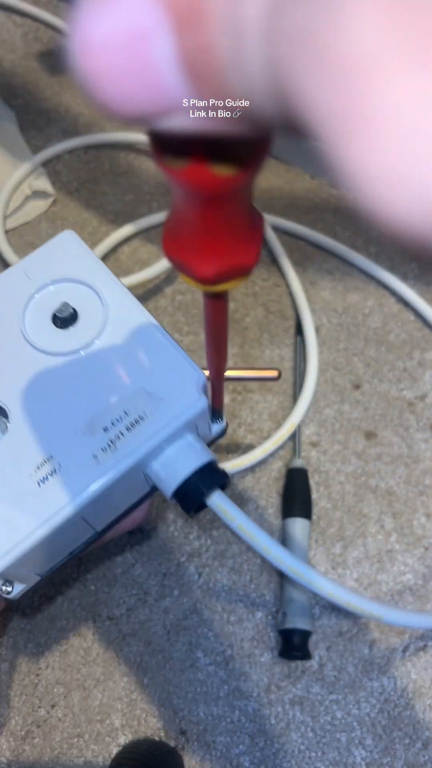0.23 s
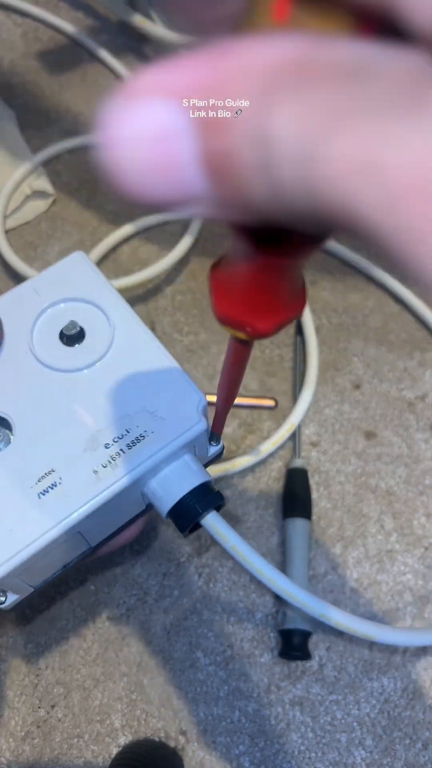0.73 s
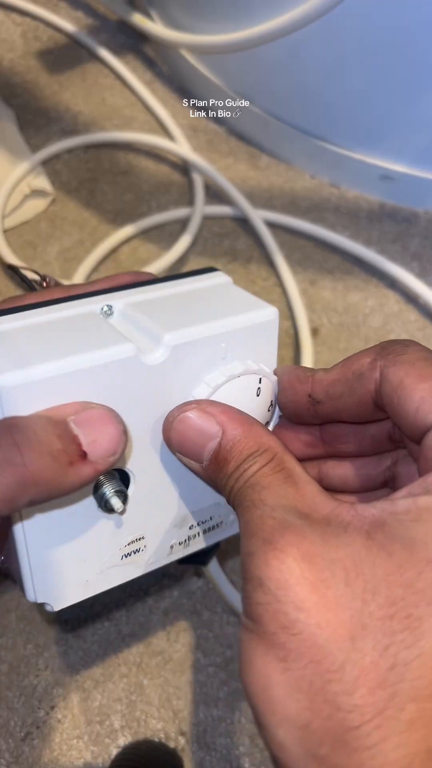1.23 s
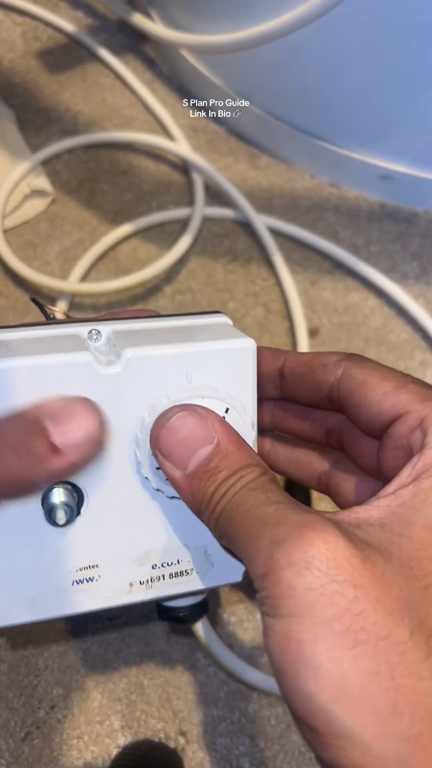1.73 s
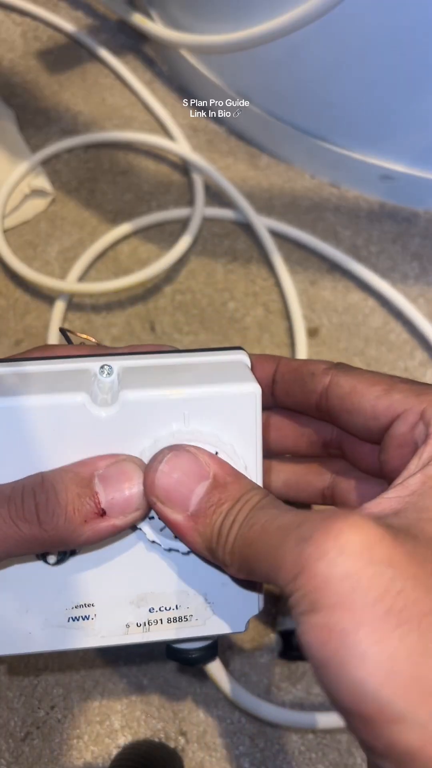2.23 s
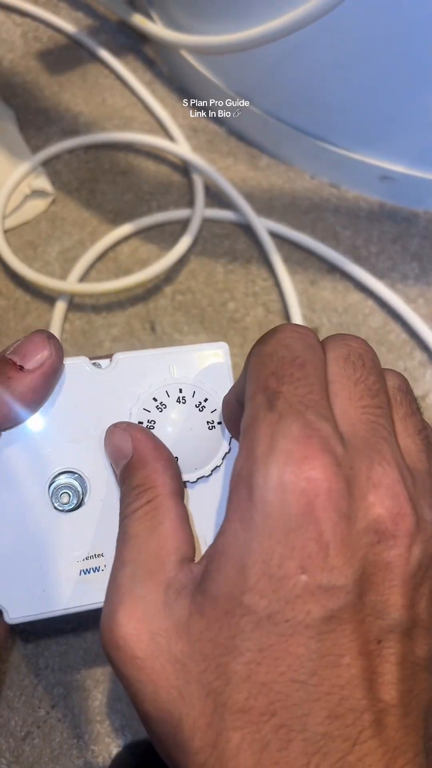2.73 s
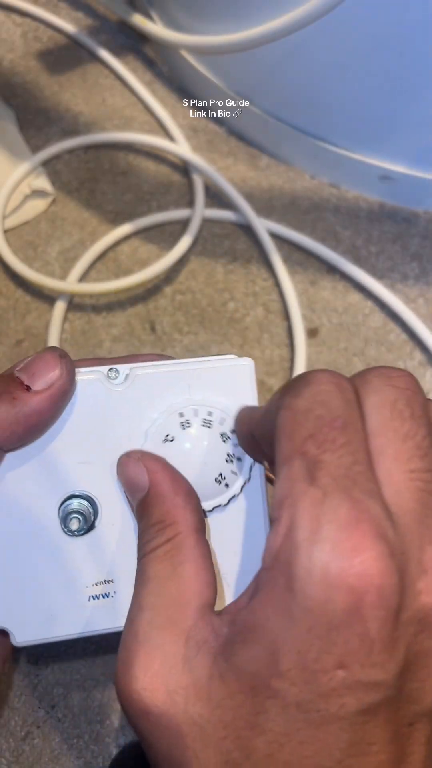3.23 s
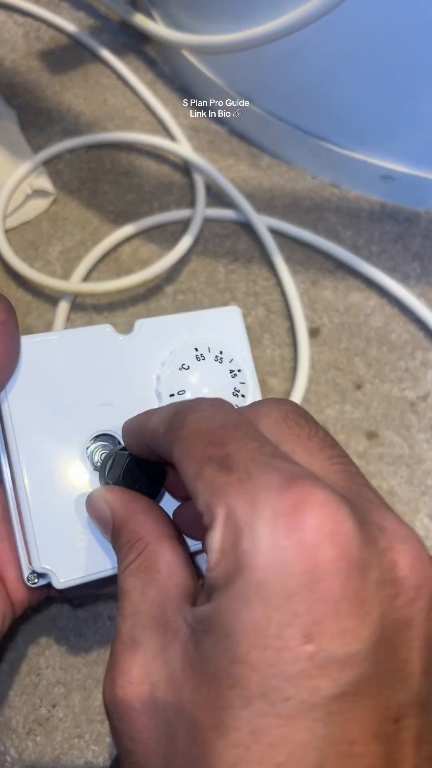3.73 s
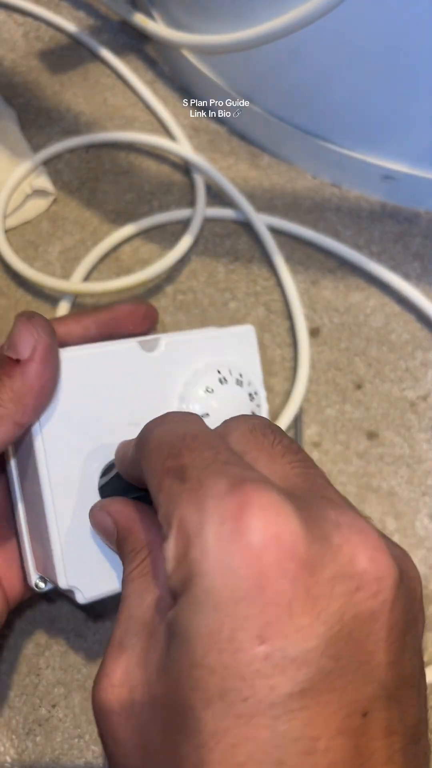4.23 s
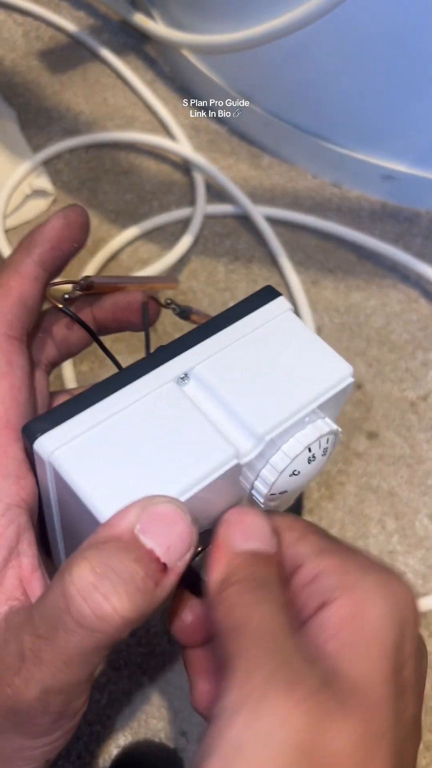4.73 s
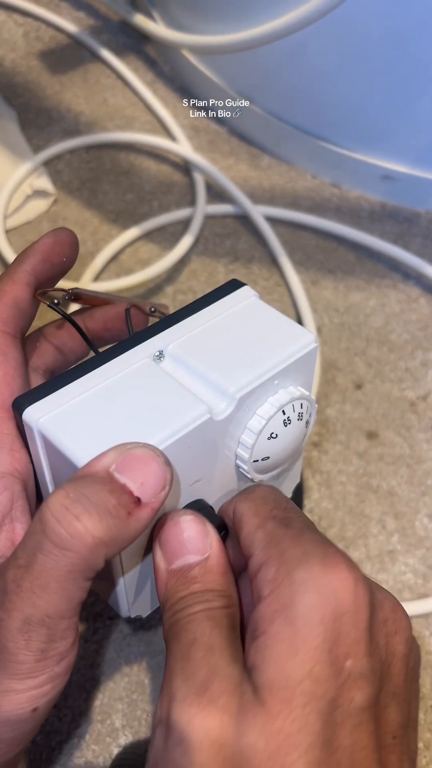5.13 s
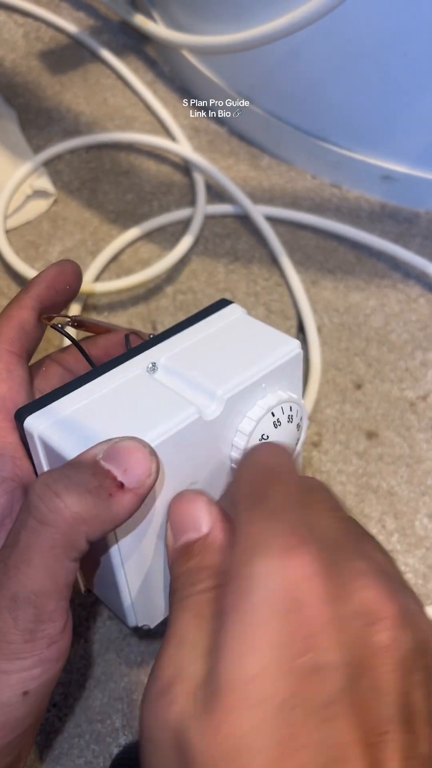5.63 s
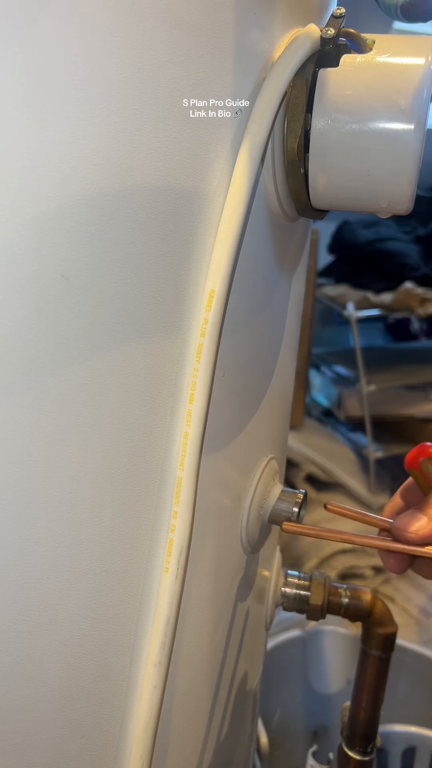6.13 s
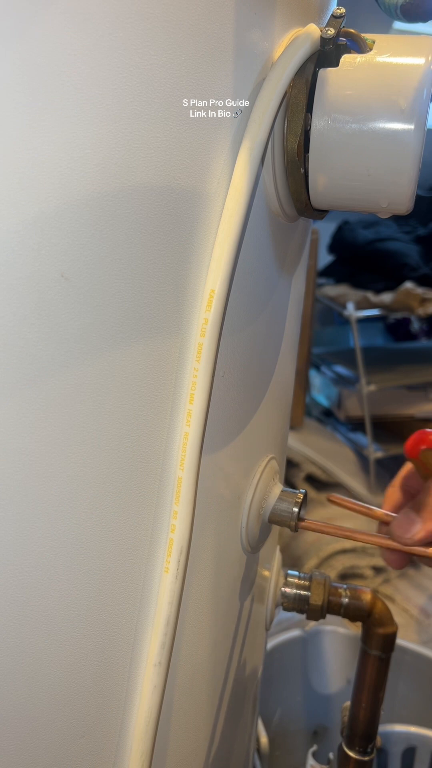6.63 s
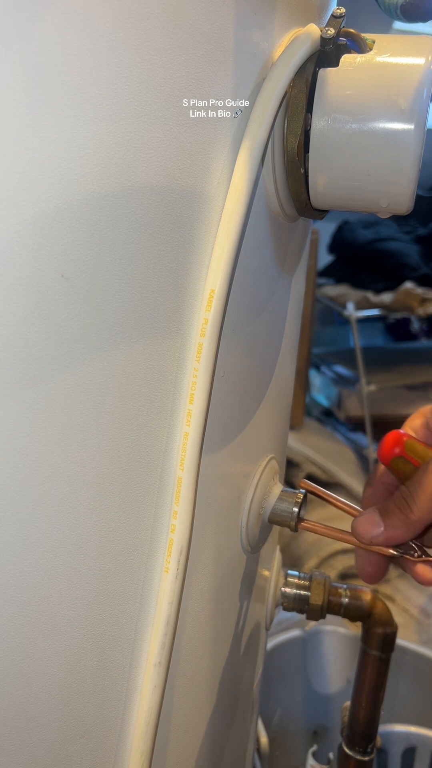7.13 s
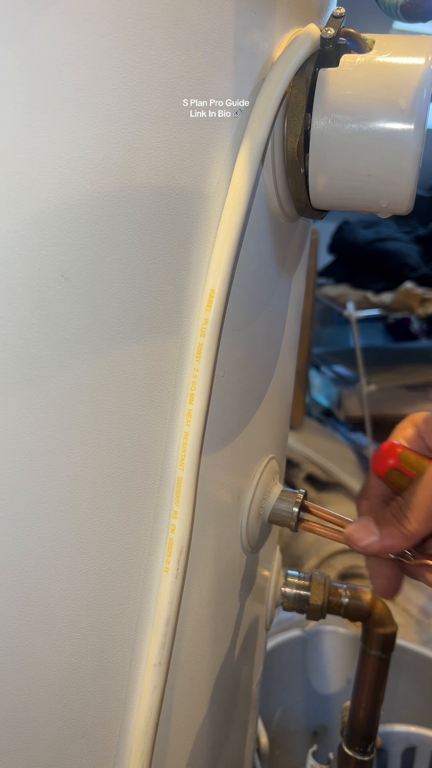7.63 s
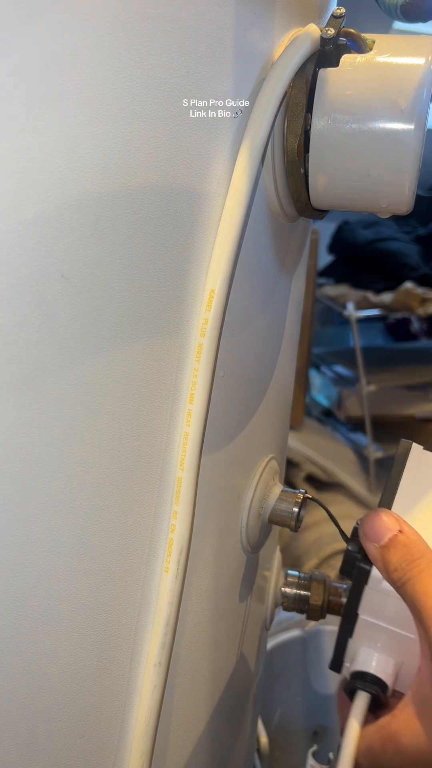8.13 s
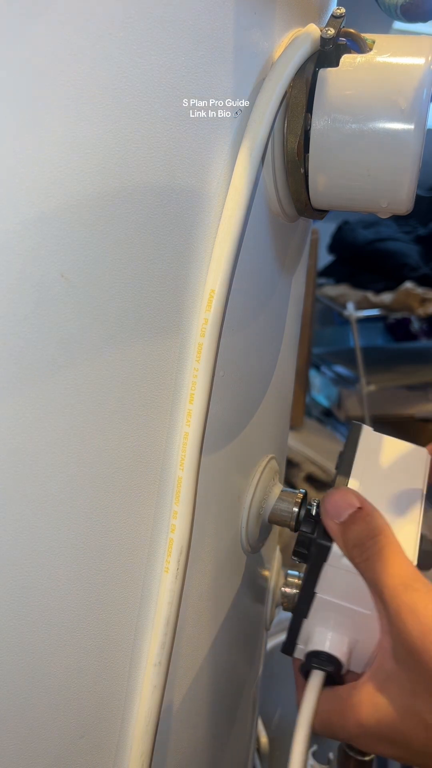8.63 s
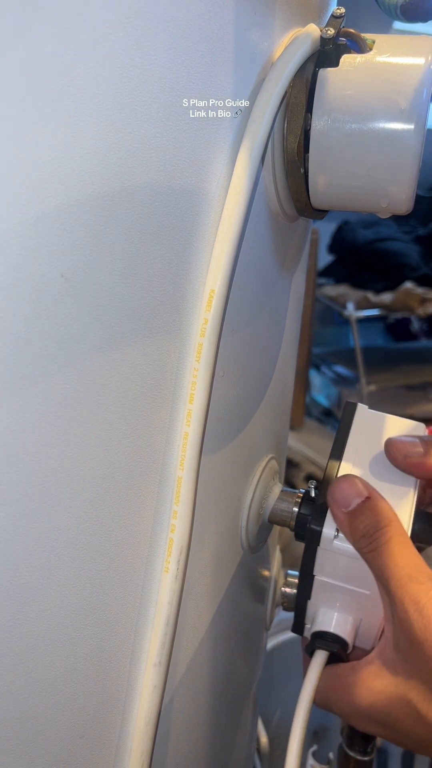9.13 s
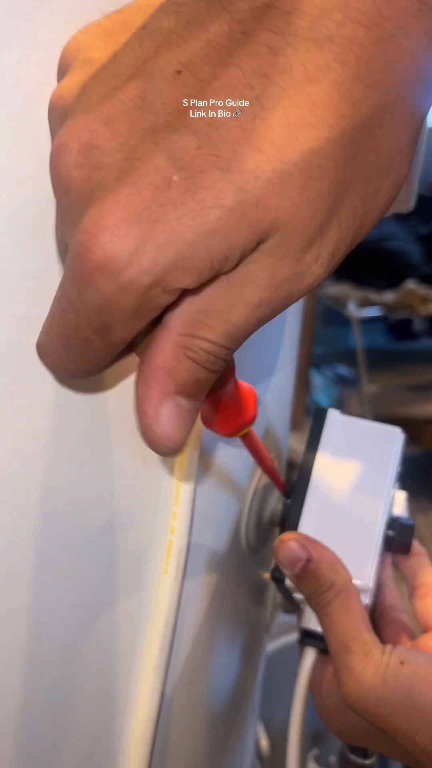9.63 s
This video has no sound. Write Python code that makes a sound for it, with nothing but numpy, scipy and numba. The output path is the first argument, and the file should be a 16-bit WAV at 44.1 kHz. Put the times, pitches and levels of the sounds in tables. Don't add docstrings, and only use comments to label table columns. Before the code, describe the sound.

A phone held near the hands picks up dry plastic taps, soft skin rubbing and low house hum. Two crisp knob snaps come early, later a lighter cap snap and a dull hand thump. After a short gap, copper rods touch a hollow steel pocket, scrape and squeak, then are pushed in with dense metallic clatter. A hard knock makes the tank resonate roughly; creaks and a final snap with light taps close it.

```python
import sys
import numpy as np
from scipy import signal
from scipy.fft import rfft, irfft
from scipy.io import wavfile
from scipy.ndimage import uniform_filter1d
from numba import njit

SR = 44100
rng = np.random.default_rng(int(sys.argv[2]) if len(sys.argv) > 2 else 0)


def boost(x):
    u = np.asarray(x, float) / 20
    return 10 ** u


def waveform_to_disk(signal):
    frames = np.transpose(np.atleast_2d(signal))
    scaled = np.clip(frames, -1, 1) * 32767
    samples = np.round(scaled).astype(np.int16)
    wavfile.write(sys.argv[1], SR, samples)


N = 435257
TIME, FREQ = np.arange(N) / SR, np.fft.rfftfreq(N, 1 / SR)
LEFT_RIGHT = np.array([[1], [-1]])


def unit(x):
    return x / np.sqrt(np.mean(x ** 2))


def on_hz(table):
    hz, value = np.transpose(table)
    return np.interp(np.log(FREQ + 1), np.log(hz), value)


def colour(x, gain):
    return unit(irfft(rfft(x) * gain, N))


def band(lo_hz, hi_hz):
    return 1 / np.sqrt((1 + (lo_hz / (FREQ + 1)) ** 8) * (1 + (FREQ / hi_hz) ** 8))


def curves(tables):
    rows = np.array([row for table in tables for row in table])
    inside = sum((TIME >= table[0][0]) & (TIME <= table[-1][0]) for table in tables) > 0
    return inside, [np.interp(TIME, rows[:, 0], column) for column in rows[:, 1:].T]


def walk(rate):
    k = int(SR / rate)
    held = np.repeat(rng.standard_normal(N // k + 1), k)
    return 0.91 * uniform_filter1d(held, k)[:N]


def grit(rate, spread_db, smooth):
    size = boost(spread_db * rng.exponential(size=N).clip(0, 3.5))
    slips = (rng.random(N) < rate / SR) * rng.standard_normal(N) * size
    return unit(slips) + smooth * rng.standard_normal(N)


def add(out, s, sound):
    i = int(s * SR)
    out[i:i + len(sound)] += sound[:N - i]


@njit
def svf(x, hz, width):
    y, b, l = np.empty(len(x)), 0., 0.
    for i in range(len(x)):
        g, k = np.tan(np.pi * hz[i] / SR), width / hz[i]
        v = (b + g * (x[i] - l)) / (1 + g * (g + k))
        b, l, y[i] = 2 * v - b, l + 2 * g * v, k * v
    return y


def blows(events, body, octaves, skirt_db, detune, crack_hz, knock_hz, knock_s):
    out, t = np.zeros(N), TIME[:2048]
    small = signal.butter(2, 420, "high", fs=SR, output="sos")
    crack_band = signal.butter(2, crack_hz, "band", fs=SR, output="sos")
    hz, t60 = np.repeat(np.transpose(body), 3, axis=1)[:, :, None]
    for s, db, main_hz, crack_db, knock_db, chatter_ms in events:
        chance, noise = rng.standard_normal((len(hz), 3)), rng.standard_normal((2, len(t)))

        skirt = boost(skirt_db) * np.minimum((main_hz / hz) ** 2.6, (hz / main_hz) ** 3) ** .5
        near_main = np.exp(-(np.log2(hz / main_hz) / octaves) ** 2)
        weight = (near_main + skirt) * boost(1.5 * chance[:, :1])
        tone = np.sin(2 * np.pi * hz * (1 + detune * chance[:, 1:2]) * t)
        ring = weight * tone * np.sign(chance[:, 2:]) * 1000. ** (-t / t60)

        contact = t * np.exp(-t * 1000 / np.clip(.5 * chatter_ms, .2, 4))
        chatter = rfft(contact * noise[0] * np.abs(noise[0]))
        chatter = irfft(chatter / np.abs(chatter) ** .8)
        chatter *= np.exp(-t * 1000 / (2 * chatter_ms))
        ring = signal.sosfilt(small, signal.fftconvolve(ring.sum(axis=0), chatter)[:len(t)])

        crack = signal.sosfilt(crack_band, contact * noise[1])
        knock = np.sin(2 * np.pi * knock_hz * (1 + 0.12 * chance[0, 1]) * t) * t * np.exp(-t / knock_s)
        for part, part_db in ((ring, 0), (crack, crack_db), (knock, knock_db)):
            add(out, s, boost(db + part_db) * part / np.abs(part).max())
    return out


def strokes(table, edge_ms, fade_db, glide_ms):
    s, length_ms, *columns = np.transpose(table)
    last = np.maximum(np.searchsorted(s, TIME) - 1, 0)
    along = (TIME - s[last]) * 1000 / length_ms[last]
    shape = ((along > 0) & (along < 1)) * boost(fade_db * along.clip(0, 1))
    edge, glide = int(edge_ms * SR / 1000), int(glide_ms * SR / 1000)
    out = []
    for column in columns:
        if column[0] > 0:
            out.append(uniform_filter1d(column[last], glide))
        else:
            out.append(uniform_filter1d(shape * boost(column[last]), edge))
    return out


def shifting(x, peaks, between_db, edges_hz, swing_db):
    rings = 0
    for hz, width, db in peaks:
        rings = rings + boost(db + swing_db * walk(16)) * svf(x, hz * (1 + 0.028 * walk(14)), 1. * width)
    return colour(rings + boost(between_db) * x, band(*edges_hz))


# start_s, level_db
HUM_LEVEL = [(0, -58), (1.9, -59.5), (2.2, -60), (2.7, -76), (3.3, -69.5), (4.0, -66), (4.7, -58.5),
             (5.15, -65), (5.3, -77), (6.0, -66.5), (8.5, -64.5), (9.87, -65)]
# pitch_hz, level_db (per Hz)
HUM_TONE = [(12, -58), (20, -35.5), (51, -4), (102, 0.5), (157, -18), (260, -30.5), (340, -60.5),
            (570, -120)]
# pitch_hz, level_db (per Hz)
AIR_TONE = [(100, -36), (170, -7.5), (475, 0.5), (708, -6.5), (2130, -4.5), (2950, -15), (7770, -25),
            (16000, -40)]
# pitch_hz, correlation (0 to 1)
AIR_LIKENESS = [(100, 0.72), (400, 0.21), (1500, 0.75), (4000, 0.24), (12000, 0.24)]


def background():
    _, (hum_db,) = curves([HUM_LEVEL])
    hum = boost(hum_db - 0.47 + 2.0 * walk(11)) * colour(rng.standard_normal(N), boost(on_hz(HUM_TONE)))
    like = np.clip(on_hz(AIR_LIKENESS), 0, 1)
    noise = rfft(rng.standard_normal((2, N))) * boost(on_hz(AIR_TONE))
    mid, side = noise[0] * np.sqrt(1 + like), noise[1] * np.sqrt(1 - like)
    air = boost(-74.5) * unit(irfft(np.array([mid + side, mid - side]), N))
    return hum + .07 * np.roll(hum, SR) * LEFT_RIGHT + air


# start_s, peak level_db, start pitch_hz, end pitch_hz, rise_ms
BUMPS = [
    (2.019, -45, 414, 75, 12.7),
    (2.509, -41, 294, 62, 11.6),
    (4.554, -39, 130, 81, 14.6),
    (4.594, -25.5, 680, 141, 11.4),
    (4.624, -37.5, 133, 94, 15.6),
    (4.678, -51.5, 397, 300, 9),
]


def bumps():
    out, t = np.zeros(N), TIME[:6000]
    for s, db, start_hz, end_hz, rise_ms in BUMPS:
        late = t * 1000 / rise_ms
        hz = end_hz + (start_hz - end_hz) * np.exp(-late / 0.38)
        swell = (late * np.exp(1 - late)) ** 2
        add(out, s, boost(db) * swell * np.sin(2 * np.pi * np.cumsum(hz) / SR))
    return out


# pitch_hz, level_db, decay_s (to -60 dB)
TANK_MODES = [(88.9, 0, .2), (160, -4, 0.67), (235, 2, 0.22), (290, -8, 0.78), (404.6, -8, 0.22),
              (558, -11, 0.44), (702.4, -2, 0.22)]
TANK_BLOWS_S = [8.06, 8.668, 9.12]
TANK_BLOWS_DB = [-55, -38, -55]
# start_s, peak_s, end_s,
# pitch_hz, level_db
LONG_HUMS = [(8.04, 8.12, 8.32, 283.5, -53.5), (6.86, 6.93, 7.01, 570, -63),
             (9.618, 9.635, 9.675, 690, -61), (7.72, 7.8, 7.87, 560, -55), (6.75, 6.78, 6.95, 4870, -62),
             (6.765, 6.8, 6.85, 5120, -52), (7.015, 7.03, 7.16, 4950, -72),
             (8.03, 8.095, 8.17, 3705, -48.5), (6.13, 6.14, 6.195, 2360, -52),
             (6.185, 6.205, 6.225, 2150, -57.5), (6.14, 6.178, 6.2, 1700, -56.5),
             (6.13, 6.135, 6.24, 6800, -60), (0.968, 0.985, 1.03, 400, -58), (1.48, 1.5, 1.565, 1090, -63),
             (4.172, 4.187, 4.225, 1120, -55)]


def tank():
    out, t = np.zeros(N), TIME[:SR // 2]
    for s, blow_db in zip(TANK_BLOWS_S, TANK_BLOWS_DB):
        for hz, db, t60 in TANK_MODES:
            waver = unit(uniform_filter1d(rng.standard_normal(len(t)), int(t60 * SR * 0.025)))
            fade = 1000. ** (-t / t60) * np.minimum(t * hz, 1)
            add(out, s, boost(blow_db + db) * (0.1 + waver) * np.sin(2 * np.pi * hz * t) * fade)
    for start, peak, end, hz, db in LONG_HUMS:
        turn = 2 * np.pi * np.cumsum(hz * (1 + .02 * walk(350))) / SR
        swell = np.interp(TIME, [start, peak, end], [0, 1, 0])
        out += boost(db + 3 + 4 * walk(90)) * swell * np.sin(turn)
    return out


# start_s, length_ms, hiss level_db, creak level_db, creak pitch_hz
RUB_KNOB = [(0.03, 76, -63.5, -84, 1820), (0.145, 24, -70, -58.5, 1050), (0.19, 63, -63, -74, 3900),
            (0.335, 77, -64.5, -80, 3270), (0.46, 104, -71, -74, 850), (0.65, 84, -63, -84, 860),
            (0.77, 45, -85, -68, 860), (0.96, 48, -102, -72, 910), (1.24, 104, -82.5, -72.5, 785),
            (1.475, 26.7, -59, -53.5, 1100), (1.6, 36, -70, -61, 1100), (1.65, 91, -75, -70, 3860),
            (1.75, 42.6, -52.5, -57, 1175), (2.24, 44, -99, -68.5, 2930), (2.73, 94, -92, -81, 3230),
            (2.85, 91, -85.5, -77, 3150), (3.04, 110, -88, -76, 2800), (3.13, 110, -86, -78, 3200)]
RUB_CAP = [(3.87, 77, -82, -66, 4170), (4.159, 65.8, -87, -64, 1135), (4.47, 36, -94, -64, 2560),
           (4.643, 84.5, -72, -64.5, 1990), (4.859, 96, -73, -72, 2000), (5.3, 113, -80.5, -100, 2130),
           (5.512, 77, -66, -72, 2410), (5.702, 59.6, -65.5, -60.5, 2010), (5.788, 34.2, -62, -68, 2120),
           (5.91, 33, -95, -65, 4370), (8.698, 29.2, -85.5, -57.5, 795), (8.879, 54.3, -60.5, -52, 2170),
           (9.063, 92, -80.5, -65, 2200), (9.38, 94.4, -79, -65.5, 2300), (9.596, 85, -71.5, -65, 830)]


def fingers():
    hiss_gain, creak_gain, creak_hz = strokes(list(RUB_KNOB) + list(RUB_CAP), 22, -0.55, 11.0)
    on_cap = (TIME > 3.6) & (TIME < 9.0)
    hiss_hz = np.where(on_cap, 8970., 7200.)
    skin, catch = grit(3300, 11.0, 1.6), grit(820, 4.2, 1.0)
    hiss = boost(-10.5) * unit(svf(skin, np.clip(hiss_hz, 3000, 14000), 1100.0))
    hiss += boost(-6.0) * colour(skin, band(3000, 12000) / FREQ.clip(4000) ** 0.24)
    creak = boost(-6.5) * unit(svf(catch, np.clip(creak_hz, 300, 6000), 135.0))
    creak += boost(-3.0) * colour(catch, band(500, 3160))
    return hiss_gain * boost(2.9 * walk(40)) * hiss + creak_gain * boost(4 * walk(60)) * creak


# start_s, peak level_db, main ring pitch_hz, crack level_db (from peak)
KNOCKS = [(6.13, -34.5, 2300, -19), (6.465, -51.5, 1060, -13), (6.729, -36.5, 2295, -40),
          (6.754, -28.5, 2300, -34), (7.423, -51.5, 2290, -26), (7.67, -52.5, 930, 13),
          (7.719, -39.5, 2360, 4.5), (7.852, -36.5, 983, -12), (8.038, -21.5, 6300, -7),
          (8.079, -35.5, 1060, -28.5), (8.095, -18, 5840, -16), (8.197, -45, 3860, -24.5),
          (8.234, -36, 3530, -26), (8.235, -39, 1610, -30), (8.284, -45.5, 1610, -50),
          (8.404, -21, 6000, -6), (8.414, -14, 5940, -33.5), (8.466, -29.5, 10000, -3),
          (8.474, -25.5, 5450, -3.5), (8.521, -32.5, 8700, -1), (8.543, -22, 9400, -17),
          (8.604, -34, 4870, -1), (8.648, -39, 1760, -40), (6.048, -56.5, 2350, -30),
          (6.275, -58.5, 1060, -39.5), (6.655, -45.5, 2310, -35), (7.023, -53, 5110, -24),
          (7.692, -43, 2350, -27), (7.731, -39.5, 2350, -20), (7.93, -35.5, 1580, -25),
          (7.978, -38, 6140, -14), (8.054, -30, 5700, -15), (8.07, -32, 5700, -8), (8.14, -25, 6830, -22),
          (8.562, -43, 8900, -12), (8.582, -34, 8850, -20)]
# pitch_hz, width_hz, level_db
POCKET = [(292, 27, -6), (555.2, 8.9, 2.5), (700, 24, -1), (1060, 43, -2), (1610, 84, -6), (2350, 76, -0.5),
          (3080, 58, -17)]
PROBES = [(3760, 110, -1), (4870, 280, -5), (5290, 180, -8), (5840, 160, -7), (6100, 103, 3.5),
          (6830, 200, 0.5), (8170, 140, -1), (8840, 94, -17), (10970, 230, -11), (14400, 2900, -19)]
# start_s, length_ms, pocket level_db, probe level_db
SCRAPE = [(5.99, 45, -67, -87.5), (6.045, 28, -64, -95), (6.13, 61, -54, -55.5), (6.185, 28, -58.5, -66),
          (6.33, 72, -77, -79), (6.42, 80, -70, -74), (6.465, 33, -64, -77), (6.654, 180, -54, -74),
          (6.745, 85, -49, -47), (6.805, 50, -52, -51), (6.86, 35, -57, -69), (6.9, 22.7, -63, -85),
          (7.0, 34, -64, -78), (7.022, 113, -61, -74.5), (7.14, 120, -70.5, -85), (7.23, 79, -65.5, -83.5),
          (7.32, 71, -64.5, -82), (7.42, 52, -59.5, -79.5), (7.64, 38, -65.5, -75), (7.67, 47, -58, -56.5),
          (7.718, 79, -53, -53), (7.803, 36.5, -54, -59), (7.846, 30, -57, -52), (7.883, 63, -50, -50),
          (7.933, 36, -52, -44.5), (7.973, 32, -46, -40), (8.003, 36, -48, -43.5), (8.036, 16, -43, -35),
          (8.062, 53, -59, -41.5), (8.093, 57, -52, -37), (8.133, 32.4, -48.5, -41.5),
          (8.168, 18, -68, -66), (8.195, 21.6, -65, -47), (8.228, 40, -51, -49.5), (8.283, 16, -56.5, -72),
          (8.35, 130, -59, -69), (8.4, 31, -39.5, -34), (8.433, 24, -47.5, -48), (8.462, 27.6, -47, -34),
          (8.492, 30, -53.5, -54), (8.52, 18.7, -56, -45), (8.544, 27.4, -49.5, -35),
          (8.578, 18.6, -51.5, -42.5), (8.6, 21, -54, -43), (8.626, 58, -59.5, -62.5)]
# start_s, pitch_hz, level_db
COLUMN = [
    [(6.13, 868, -75), (6.154, 810, -64), (6.21, 1030, -60), (6.266, 1010, -74), (6.278, 960, -67),
     (6.29, 980, -86)],
    [(6.75, 1153, -54), (6.76, 1170, -48), (6.82, 900, -57), (6.96, 570, -63), (7.008, 570, -74),
     (7.03, 540, -57), (7.12, 658, -77)],
    [(7.63, 941, -74), (7.696, 934, -54), (7.71, 890, -59), (7.73, 780, -54), (7.752, 700, -51),
     (7.762, 760, -45.5), (7.84, 600, -59)],
    [(7.845, 951, -47.5), (7.857, 962, -41), (7.877, 906, -49), (7.909, 750, -42.5), (7.977, 940, -39),
     (8.009, 886, -53), (8.02, 933, -49)],
    [(8.025, 660, -42), (8.063, 640, -40.5), (8.153, 780, -48.5), (8.203, 640, -53), (8.245, 784, -51),
     (8.263, 742, -73.5), (8.3, 1150, -57)],
    [(8.36, 628, -62), (8.386, 605, -60), (8.398, 590, -41.5), (8.414, 527, -41.5), (8.45, 523, -57),
     (8.484, 631, -56.5), (8.5, 623, -68.5)],
]
COLUMN_LIGHT = [
    [(6.465, 806, -61), (6.507, 653, -57), (6.511, 674, -61.5), (6.619, 555, -86), (6.63, 565, -96)],
    [(7.13, 600, -69), (7.248, 720, -70.5), (7.384, 566, -71.5), (7.43, 1060, -65), (7.5, 640, -66)],
]
# start_s, slip rate pitch_hz, level_db
SQUEAK_LOW = [(6.668, 1180, -56), (6.684, 1181, -45), (6.716, 1180, -59), (6.73, 1220, -45.5),
              (6.754, 1210, -57), (6.77, 1294, -51), (6.785, 1090, -57)]
SQUEAK_HIGH = [(6.772, 1760, -60), (6.79, 1676, -42), (6.808, 1703, -47), (6.816, 1800, -45.5),
               (6.846, 1787, -48), (6.862, 1802, -62)]
OVERTONES_DB = [0, 1.5, -30, -24, -32], [0, -9, -12, -10, -20]
# pitch_hz, level_db, decay_s (to -60 dB)
PING = [(4860, -60, .11), (4300, -54, .17), (2950, -64, .09)]
PING_S = [4.166, 6.468, 4.342]


def probes():
    ringing = list(POCKET[3:]) + list(PROBES)
    body = [(hz, np.log(1000) / np.pi / width) for hz, width, db in ringing]
    knocks = [tuple(row) + (-22, 2.2) for row in KNOCKS]
    out = blows(knocks, body, 0.18, -15.0, 0.014, [8500, 14000], 666, 0.00065)

    pocket, probe = strokes(SCRAPE, 5.0, -6.0, 110)
    slips = grit(2500, 3.4, 0.97) * boost(1.76 * walk(60))
    pushes = sorted(list(COLUMN) + list(COLUMN_LIGHT), key=lambda push: push[0][0])
    inside, (column_hz, column_db) = curves(pushes)
    column_hz = np.clip(column_hz * (1 + 0.051 * walk(40)), 300, 3000)
    column = unit(svf(slips, column_hz, 110.))
    column += boost(-15.5 + 7.3 * walk(17)) * unit(svf(slips, 1.9 * column_hz, 191.0))
    out += uniform_filter1d(1. * inside, size=400) * boost(column_db - 3.0 + 1.4 * walk(60)) * column
    out += pocket * boost(1.9 * walk(44)) * shifting(slips, POCKET, -12.5, [260, 3000], 1.4)
    out += probe * boost(3.7 * walk(90)) * shifting(slips, PROBES, -19.0, [3200, 16800], 4.8)

    for table, overtones in zip((SQUEAK_LOW, SQUEAK_HIGH), OVERTONES_DB):
        inside, (hz, db) = curves([table])
        turn = 2 * np.pi * np.cumsum(hz * (1 + .016 * walk(400) + .008 * walk(70))) / SR
        tone = sum(boost(o + 3 * walk(200)) * np.sin((k + 1) * turn) for k, o in enumerate(overtones))
        out += uniform_filter1d(1. * inside, size=200) * boost(db + 3.5) * tone

    t = TIME[:9000]
    for s, (hz, db, t60) in zip(PING_S, PING):
        add(out, s, boost(db) * np.sin(2 * np.pi * hz * t) * 1000. ** (-t / t60))
    return out


HOUSING_HZ = [700, 900, 1090, 1400, 1820, 2070, 2400, 2800, 3200, 3800, 4800, 6000, 7500]
# start_s, peak level_db, main ring pitch_hz
SCREW = [(0.002, -45, 800), (0.014, -46, 850), (0.018, -36, 2630), (0.148, -44, 650), (0.162, -49, 1120),
         (0.261, -46.5, 700), (0.318, -38.5, 810), (0.336, -36.5, 1450), (0.46, -40.5, 706),
         (0.472, -38.5, 740), (0.527, -40.5, 1190), (0.633, -40.5, 970), (0.651, -33.5, 930.3),
         (0.772, -34.5, 822.6), (0.788, -41, 2970)]
PADS = [(4.568, -49, 790), (1.298, -56, 700), (0.965, -49, 950), (1.313, -47.5, 670), (1.3, -55.5, 1220),
        (4.645, -47.5, 1000), (4.68, -42, 1080), (4.959, -52, 1210), (5.053, -53, 1180)]
NAILS = [(0.339, -43, 3250), (0.474, -42.5, 3840), (0.652, -48, 3100), (2.272, -57, 2900),
         (5.921, -63, 2800), (9.413, -57, 2400), (9.447, -54, 2400), (1.476, -50.5, 1060),
         (1.752, -48, 1120), (3.871, -46, 2460), (3.884, -39, 3320), (3.915, -38, 1910),
         (4.166, -48.5, 2930), (4.338, -36.5, 1380), (4.708, -44.5, 1924), (5.519, -45.5, 2080),
         (5.769, -36, 2320), (5.779, -44, 1979), (8.884, -34, 1680), (9.652, -58, 2300), (9.175, -60, 5970),
         (1.635, -59, 2800)]
EDGES = [(1.581, -40.5, 1180), (1.607, -49, 1040), (1.806, -35.5, 1170), (2.053, -41.5, 3666),
         (3.253, -49.5, 1180), (3.76, -52.5, 2420), (3.926, -43, 2680), (4.172, -39.5, 1080),
         (4.494, -39.5, 1760), (4.861, -44.5, 1900), (4.876, -45.5, 1980), (5.703, -44, 1880),
         (5.713, -49, 2350), (9.491, -34, 2130), (9.612, -37, 978), (9.702, -46.5, 2120),
         (9.838, -34, 2380), (4.22, -57, 3900), (4.475, -54, 2800)]
# start_s, peak level_db, main ring pitch_hz, crack level_db, hollow knock level_db (from peak)
SNAPS = [
    (2.018, -16, 3124, -11, -23),
    (2.492, -30.5, 2712, -22, -14.5),
    (2.504, -9, 2550, -1.5, -26.5),
    (2.518, -33, 2725, -18, -6.5),
    (4.2607, -28, 2250, -13.5, -43),
    (4.261, -18, 2924, -8.5, -48),
    (4.264, -24.5, 1860, -14, -39),
    (8.666, -18, 1744, -37, -18),
    (9.375, -25.5, 2150, -13.5, -23),
]
LID = [
    (2.0205, -23.5, 1026, -37.5, -7.5),
    (2.506, -16, 1089, -28, -16.5),
]


def housing():
    body = [(hz, 0.033 * np.sqrt(700 / hz)) for hz in HOUSING_HZ]  # pitch, decay s
    body += [(1100, 0.032)]
    gripped = [(hz, 0.55 * t60) for hz, t60 in body]

    start, end = 2.484, 2.503
    swell = np.interp(TIME, [start, end - .003, end], [0, 1, 0])
    squeal = boost(-40) * swell * np.sin(2 * np.pi * np.cumsum(7750 * (1 + .01 * walk(500))) / SR)

    # crack dB and hollow knock dB (from peak), chatter ms; the lid has its own dB columns
    kinds = ((LID, (1,)), (SCREW, (-41, -42, 4.34)), (PADS, (-54, -4, 0.56)),
             (NAILS, (-5, -41, 3)), (EDGES, (-53, -26.5, 2.13)))
    taps = [tuple(row) + touch for table, touch in kinds for row in table]
    snaps = [tuple(row) + (1.3,) for row in SNAPS]
    snapping = blows(snaps, gripped, 0.5, -7, 0.04, [2900, 13000], 420, 0.0043)
    tapping = blows(taps, body, 0.37, -7.5, 0.051, [2800, 11000], 430, 0.0022)
    return squeal + snapping + tapping


# pitch_hz, left lead (radians)
PORTS = ([(100, 0), (520, -.55), (1120, .45), (4480, .6), (5500, -.95), (9000, .6), (11000, -1.8),
         (16000, -1.5)], [(100, 0), (2400, .6), (4300, 1.0), (4900, .1), (6700, -1.6), (10000, -1.1),
         (16000, -1.1)])
# pitch_hz, swing (radians)
SWAY = [(125, .1), (500, .35), (1300, .1), (12000, .5)]
# start_s, end_s
GAPS = [
    (.81, .838),
    (2.643, 2.667),
    (3.608, 3.628),
    (4.518, 4.544),
    (5.933, 5.988),
    (9.293, 9.36),
]


def scene():
    near = housing() + probes() + fingers() + tank()
    spectrum = rfft(near)
    floor, wall = (irfft(spectrum * np.exp(.5j * on_hz(lag) * LEFT_RIGHT), N) for lag in PORTS)
    at_tank = (TIME > GAPS[4][0]) & (TIME < GAPS[5][1])
    direct = np.where(at_tank, wall, floor)
    direct = direct + walk(6) * irfft(spectrum * 1j * on_hz(SWAY), N) * LEFT_RIGHT

    t = TIME[:SR // 4]
    shared, own = rng.standard_normal(len(t)), rng.standard_normal((2, len(t)))
    diffuse = signal.lfilter([1, -.6], [1], shared + 2.2 * own)
    tail = diffuse * 1000. ** (-t / 0.15) * (t > .004)
    tail = tail / np.sqrt(np.sum(tail ** 2) / 2)
    room = boost(-17) * signal.fftconvolve(near[None], tail, axes=1)[:, :N]
    return direct + room + bumps() * boost(-.15 * LEFT_RIGHT) + background()


def low_pass(x):
    return signal.sosfilt(signal.butter(12, 16810, fs=SR, output="sos"), x)


def record(dry):
    on = 1. - sum((TIME > start) & (TIME < end) for start, end in GAPS)
    top = signal.ellip(8, .2, 70, 16050, fs=SR, output="sos")
    mix = signal.sosfilt(top, dry) * uniform_filter1d(on, size=40)
    return low_pass(mix)


dry = scene()
out = record(dry)
waveform_to_disk(out)
```